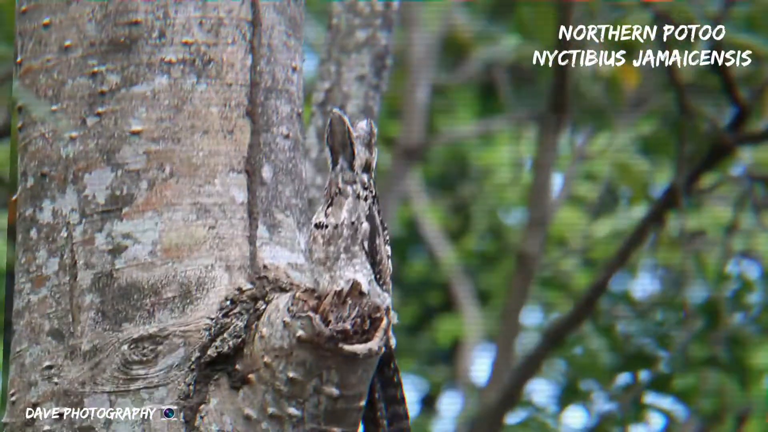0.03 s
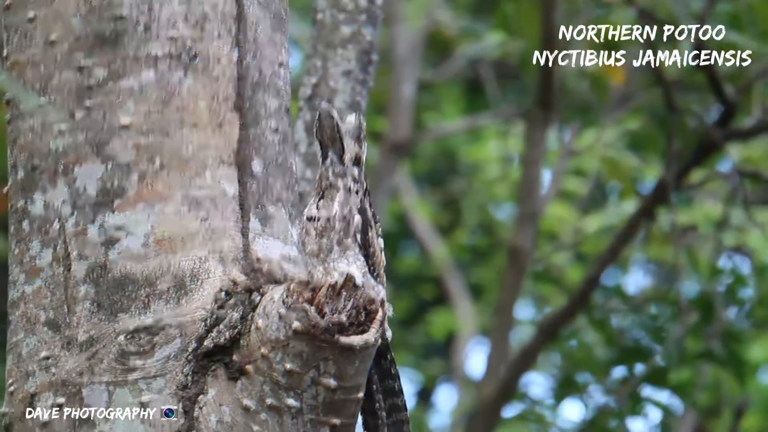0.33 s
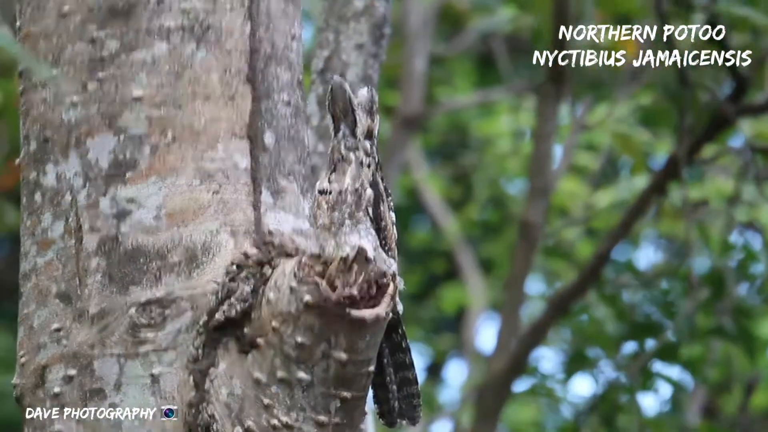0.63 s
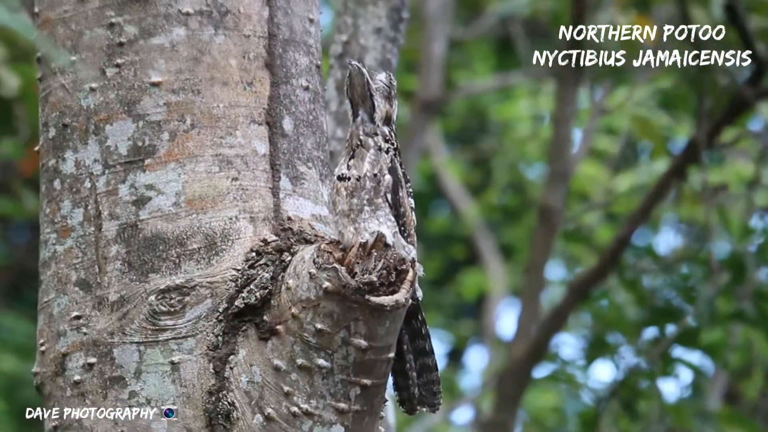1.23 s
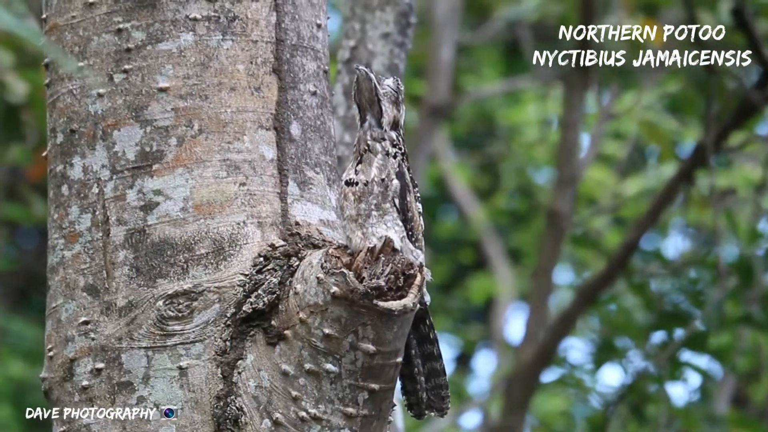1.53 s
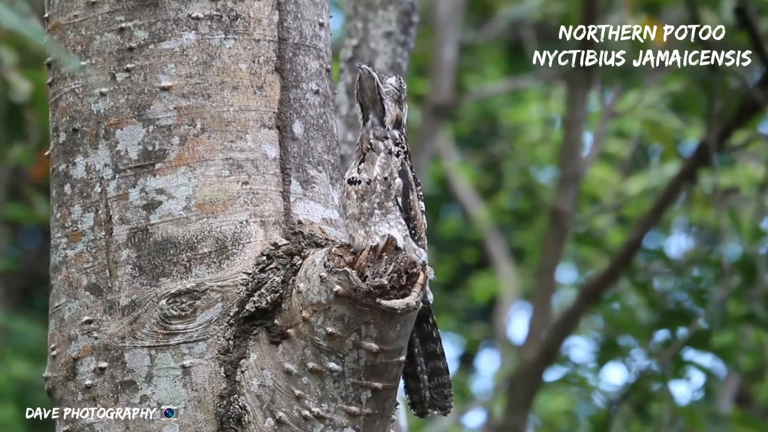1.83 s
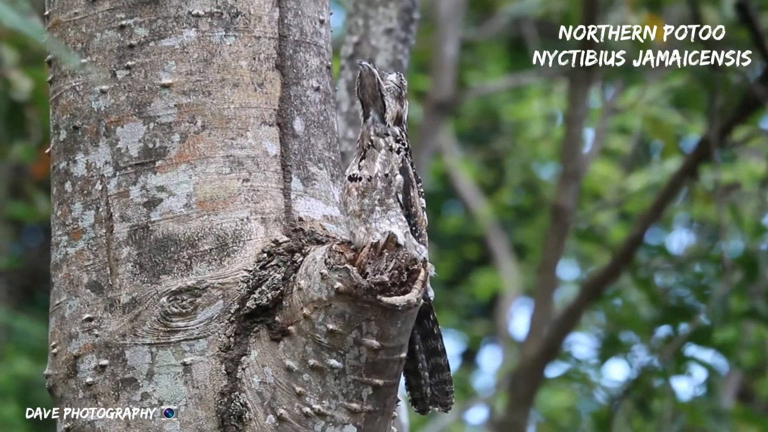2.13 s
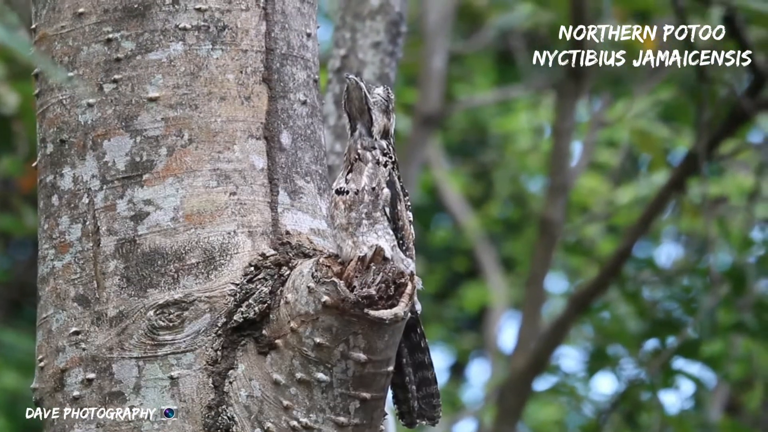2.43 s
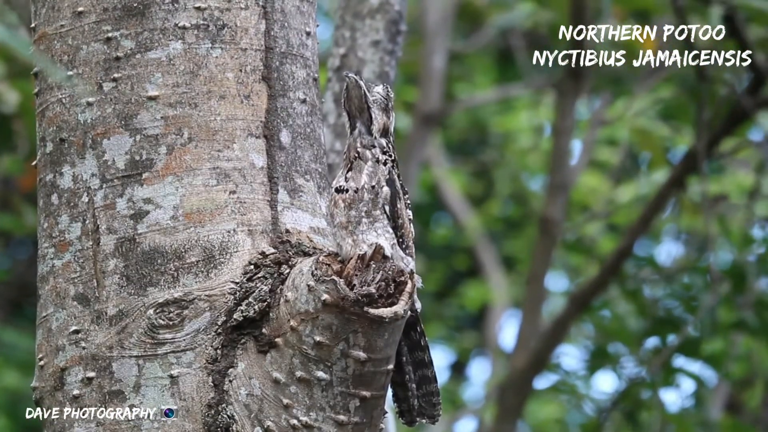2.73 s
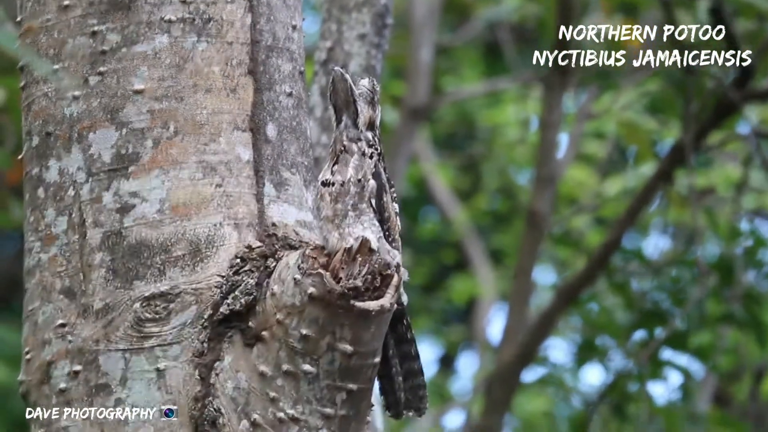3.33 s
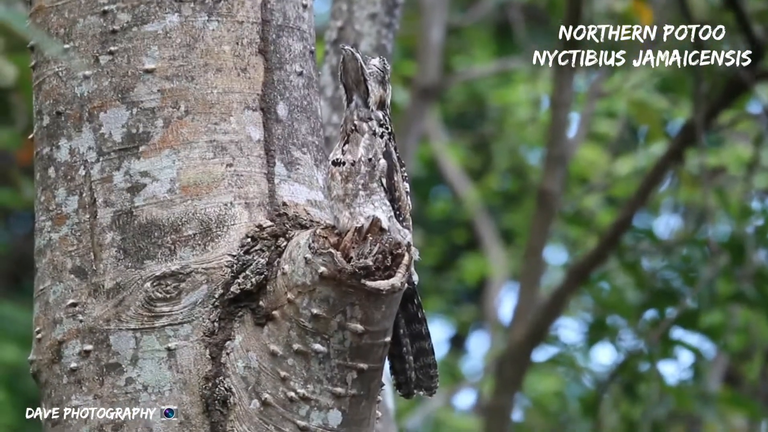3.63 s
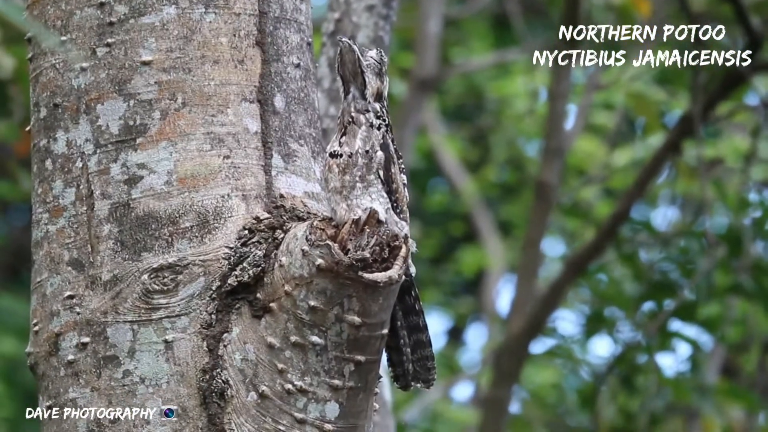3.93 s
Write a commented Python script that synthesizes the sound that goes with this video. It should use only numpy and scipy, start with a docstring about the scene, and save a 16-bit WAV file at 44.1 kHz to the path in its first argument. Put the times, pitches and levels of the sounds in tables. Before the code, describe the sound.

A cicada buzzes close to the microphone, high and steady, in a tropical wood. Further off, other insects hiss and faint birds cluck, peep, whistle a falling run and then chip, over a soft rush of air.

```python
"""A steady, high buzz: one cicada close to the microphone, in a tropical wood by day.
Every cycle of its tymbals sends a fixed group of clicks through its resonant body, and the trees
echo the buzz. Further off, an insect chorus hisses and birds whistle, cluck, chip and peep.
Behind them all lies a soft, low rush of air. Mono, from one spot."""
import sys
import numpy as np
from scipy import signal
from scipy.fft import rfft, irfft
from scipy.io import wavfile

SR = 44100
rng = np.random.default_rng(int(sys.argv[2]) if len(sys.argv) > 2 else 0)


def store_wav(level_fs):
    """Save 16-bit WAV to argv[1]."""
    pcm = np.round(np.clip(np.atleast_2d(level_fs), -1, 1) * 32767)
    wavfile.write(sys.argv[1], SR, pcm.T.astype(np.int16))


N = 176400

# Spectrum of the low rush of the wood: f/Hz, level/dB (levels in all tables are relative)
AIR_SPECTRUM = [(12, -34), (20, -3), (153, -2.5), (278, 1.5), (905, -7.5), (1140, -9.5), (1470, -9.5),
                (1610, -13), (1940, -10.5), (2180, -15.5), (3700, -17), (4160, -19.5), (5000, -19.5),
                (6500, -40.5), (11000, -120)]
# Spectrum of the far insect chorus: f/Hz, level/dB
CHORUS_SPECTRUM = [(4500, -36), (5500, -26.5), (6200, -20.5), (7000, -6.5), (7900, 1.5), (8600, -2.5),
                   (9300, -6.5), (10200, -18), (11000, -26), (11700, -32), (15500, -44.5)]
# A falling, quickening run of whistles: t/s, length/s, f/Hz, level/dB, fall/octaves
WHISTLE_NOTES = [(0.581, 0.136, 2560, -60, 0.11), (0.979, .16, 2525, -60, .11),
                 (1.298, .08, 2266, -58.5, .14), (1.64, .06, 2080, -63, .05),
                 (1.781, .08, 2037, -60, 0.052), (1.891, 0.065, 2000, -60, 0.052),
                 (2.01, 0.073, 2005, -58, 0.032), (2.147, .08, 2000, -58.5, .03),
                 (2.28, .07, 1988, -62.5, .03), (2.4, .08, 1993, -58.5, 0.036)]
# Thin, high peeps: t/s, length/s, f/Hz, level/dB
PEEP_NOTES = [(.11, .05, 3210, -65), (.2, .05, 3210, -67), (.55, .07, 3790, -66), (.68, 0.087, 3830, -62),
              (1.31, .07, 3790, -63), (1.73, .05, 3220, -62), (1.81, 0.053, 3830, -64),
              (1.9, .07, 3830, -70), (2.19, 0.048, 3220, -64), (2.66, .04, 3220, -62),
              (2.77, .07, 3200, -69), (3.14, .1, 3200, -69), (3.25, .1, 3200, -69), (3.58, .08, 3990, -67),
              (3.7, 0.046, 3210, -67), (3.82, .05, 3220, -63.5)]
# Sharp, down-slurred chips: t/s, length/s, f/Hz, level/dB, fall/octaves
CHIP_NOTES = [(2.685, 0.084, 3520, -56.5, 0.58), (2.734, 0.054, 3080, -59, .2), (3.041, .07, 3600, -63, .4)]
# Short, throaty clucks: t/s, f/Hz, level/dB
CLUCK_NOTES = [(.505, 1300, -54.5), (.555, 1320, -59), (.685, 1455, -54), (.735, 1330, -56),
               (.795, 1470, -54.5), (.872, 1390, -57), (1.132, 1480, -53.5), (1.138, 1334, -53),
               (1.52, 1480, -55.5), (1.612, 1492, -57), (1.79, 1490, -56), (2.005, 1414, -56),
               (2.26, 1484, -56.5), (2.308, 1470, -50), (2.488, 1500, -58), (2.58, 1475, -58),
               (3.125, 1470, -56), (3.182, 1475, -54.5), (3.285, 1314, -53.5), (3.365, 1484, -57.5),
               (3.685, 1490, -65)]
# The clicks of one tymbal cycle: position/cycles, level/dB
TYMBAL_CLICKS = [(.155, -0.5), (.4, -7), (.66, -10), (.95, -0.5)]
# Resonance of the cicada's body: f/Hz, level/dB
BODY_RESONANCE = [(4500, -50), (5500, -33), (6200, -24.5), (7000, -12.5), (7500, -5), (8050, 1), (8600, -2),
                  (9200, -6), (9700, -11.5), (10300, -22), (10650, -22), (11200, -29.5), (11500, -40),
                  (13000, -49), (15500, -55.5)]
# Overall level at the microphone, swelling at the start: t/s, level/dB
OPENING_SWELL = [(0, -4.5), (.1, -1), (.22, 0.5), (4, 1)]

CLUCK_S, CLUCK_FALL_OCTAVES = 0.032, 0.12


def from_db(db):
    """Decibels to gain."""
    return 10 ** (np.asarray(db) / 20)


def unit_rms(x):
    """Scale to an rms of 1."""
    return x / np.sqrt(np.mean(x ** 2) + 1e-20)


def drift(rate_hz, size=N):
    """Random wander, mostly slower than rate_hz; rms 1."""
    pole = np.exp(-2 * np.pi * rate_hz / SR)
    noise = rng.standard_normal(size + SR)
    return unit_rms(signal.lfilter([1], [1, -2 * pole, pole * pole], noise)[SR:])


def colour(x, spectrum):
    """Pass a sound through a causal filter with the given spectrum; rms 1."""
    size = 2 * N
    hz, db = np.transpose(spectrum)
    grid_hz = np.maximum(np.fft.rfftfreq(size, 1 / SR), 1)
    gain = from_db(np.interp(np.log(grid_hz), np.log(hz), db))
    cepstrum = irfft(np.log(gain))
    cepstrum[1:N] *= 2   # minimum phase: the ringing follows each click
    cepstrum[N + 1:] = 0
    return unit_rms(irfft(rfft(x, size) * np.exp(rfft(cepstrum)))[:N])


def tree_echoes(x, t60_s):
    """Dense, dying echoes from the trunks and leaves around the microphone."""
    t = np.arange(SR) / SR
    build_up = 1 - np.exp(-t / 0.0096)
    tail = rng.standard_normal(SR) * from_db(-60 * t / t60_s) * build_up
    return signal.fftconvolve(x, tail / np.linalg.norm(tail))[:len(x)]


def air():
    """Far wind and leaves make a soft, nearly even rush."""
    level_db = -49.5 + 0.56 * drift(rate_hz=8.2)
    return from_db(level_db) * colour(rng.standard_normal(N), AIR_SPECTRUM)


def far_chorus():
    """Many insects deep in the wood merge into a smooth, high hiss."""
    return from_db(-35) * colour(rng.standard_normal(N), CHORUS_SPECTRUM)


def bird_note(start_s, length_s, middle_hz, db, fall_octaves, rasp=0):
    """One note: a falling sine under a rounded envelope, with an optional rasp."""
    size = int(length_s * SR)
    progress = np.linspace(0, 1, size)
    hz = middle_hz * 2 ** (fall_octaves * (.5 - progress))
    phase = 2 * np.pi * np.cumsum(hz) / SR
    envelope = np.sin(np.pi * progress) * (1 + rasp * drift(rate_hz=160, size=size))
    tone = np.sqrt(2) * np.sin(phase) * envelope
    return np.pad(from_db(db) * tone, (int(start_s * SR), N))[:N]


def far_chatter(clucks_per_s=14):
    """Fainter clucks from further off, at random moments and pitches."""
    clucks = np.zeros(N)
    for _ in range(int(clucks_per_s * N / SR)):
        start_s = rng.uniform(0, N / SR)
        hz = 1390 + rng.uniform(-91, 91)
        db = -60.5 + rng.uniform(-2, 2)
        clucks += bird_note(start_s, CLUCK_S, hz, db, CLUCK_FALL_OCTAVES)
    return clucks


def distant_birds(t60_s=0.6):
    """Whistles, peeps, chips and clucks, blurred by the trees on their way to the microphone."""
    calls = sum(bird_note(*row, rasp=0.36) for row in WHISTLE_NOTES)
    calls += sum(bird_note(*row, fall_octaves=0.013) for row in PEEP_NOTES)
    calls += sum(bird_note(*row, rasp=0.42) for row in CHIP_NOTES)
    clucks = sum(bird_note(start_s, CLUCK_S, hz, db, CLUCK_FALL_OCTAVES, rasp=0.5)
                 for start_s, hz, db in CLUCK_NOTES)
    clucks += far_chatter()
    blurred_calls = from_db(-2) * calls + from_db(-3) * tree_echoes(calls, t60_s)
    return blurred_calls + clucks + from_db(-8) * tree_echoes(clucks, t60_s)


def near_cicada(buzz_hz=105.0, rate_wander=0.000501, jitter_s=24e-6, spread_db=2):
    """Close by, tymbals send slightly uneven clicks into the resonant body; trees scatter the buzz."""
    cycles = np.arange(int(N / SR * buzz_hz))
    wander = drift(rate_hz=4.01)[(cycles / buzz_hz * SR).astype(int)]
    starts_s = (cycles + rate_wander * np.cumsum(wander - wander.mean())) / buzz_hz
    clicks = np.zeros(N)
    for position, db in TYMBAL_CLICKS:
        centres = SR * (starts_s + position / buzz_hz + jitter_s * rng.standard_normal(len(cycles)))
        strength = from_db(db + spread_db * rng.standard_normal(len(cycles)))
        taps = centres.astype(int)[:, None] + np.arange(-8, 9)
        pulses = np.sinc(taps - centres[:, None])   # clicks can fall between samples
        np.add.at(clicks, taps % N, strength[:, None] * pulses)
    buzz = colour(clicks, BODY_RESONANCE)
    # A lead-in of buzz has the wood already ringing at the start.
    echoes = unit_rms(tree_echoes(np.tile(buzz, 2), t60_s=0.49)[N:])
    return from_db(-35) * buzz + from_db(-33.5) * echoes


def scene():
    """The wood from one spot, in mono: cicada in front, chorus, air and birds behind."""
    swell = from_db(np.interp(np.arange(N) / SR, *np.transpose(OPENING_SWELL)))
    wood = near_cicada() + far_chorus() + air() + distant_birds()
    return (swell * wood)[None]


def record(dry):
    """The microphone signal passes a steep treble cut."""
    cutoff_hz = 15450
    return signal.sosfilt(signal.ellip(12, .1, 80, cutoff_hz, fs=SR, output="sos"), dry)


dry = scene()
out = record(dry)
store_wav(out)
```